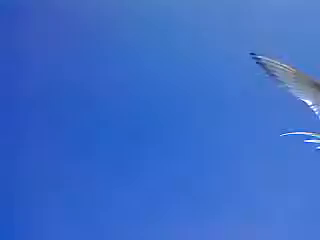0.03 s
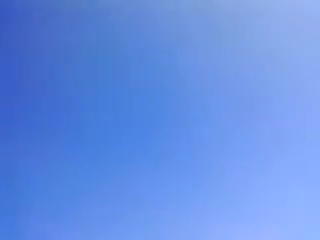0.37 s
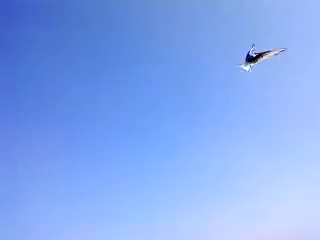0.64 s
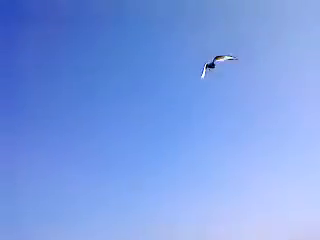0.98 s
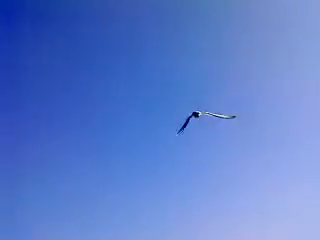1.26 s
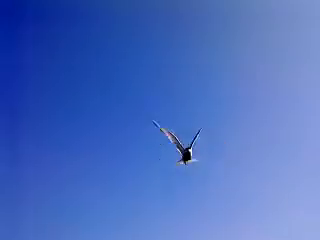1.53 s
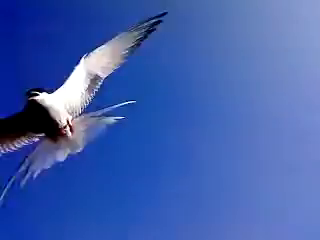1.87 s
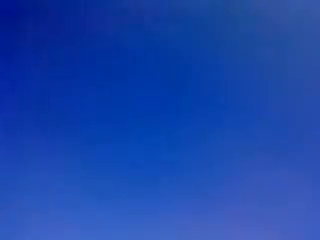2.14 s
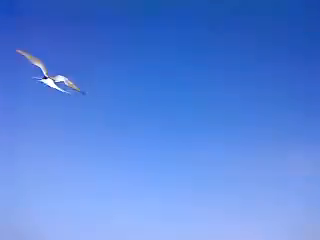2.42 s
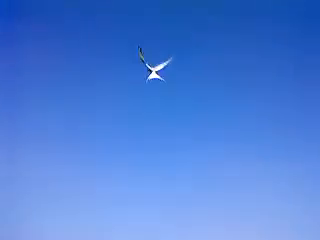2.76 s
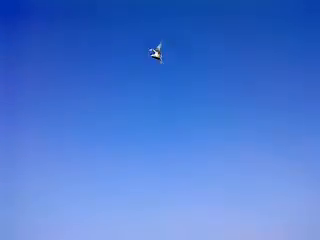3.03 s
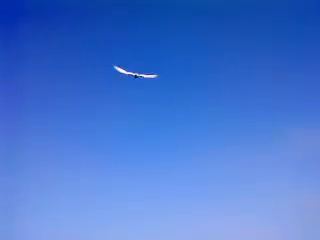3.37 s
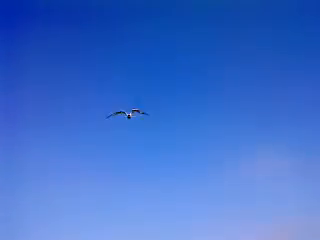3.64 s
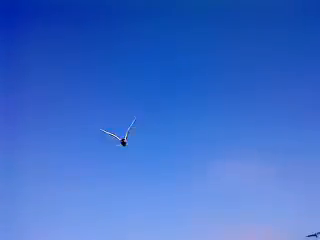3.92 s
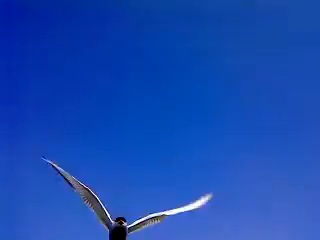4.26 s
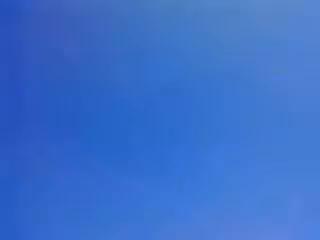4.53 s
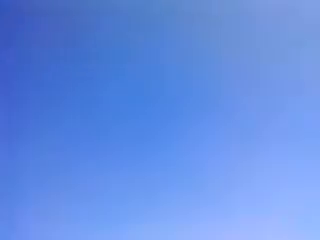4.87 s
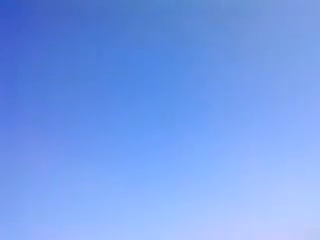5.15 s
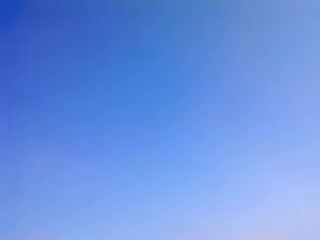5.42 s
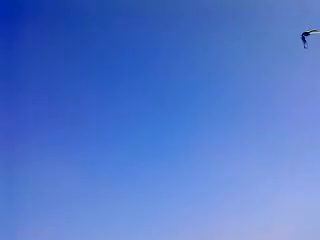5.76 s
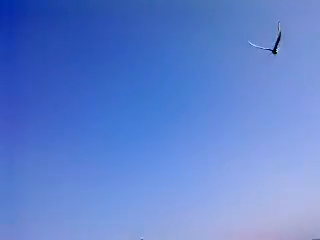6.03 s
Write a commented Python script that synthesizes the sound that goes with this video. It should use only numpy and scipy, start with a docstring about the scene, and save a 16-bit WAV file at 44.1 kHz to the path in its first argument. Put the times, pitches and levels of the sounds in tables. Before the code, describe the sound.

Sharp, high tern calls and a brief raspy rattle come from overhead over gusty low wind rumble and faint hiss.

```python
"""Open, windy shore: terns swoop at an intruder.
Eddies rumble and buffet the microphone. Background hiss dips after loud calls and creeps back.
The nearest bird dives with sharp 'kek' notes: chaotic syrinx pulses ringing the throat.
Others give falling 'kip' whistles that break into rasp, a chopped trill and a dry, pulsed rattle."""
import sys
import numpy as np
from scipy import signal
from scipy.fft import rfft, irfft
from scipy.io import wavfile
from scipy.ndimage import uniform_filter1d

SR = 44100
rng = np.random.default_rng(int(sys.argv[2]) if len(sys.argv) > 2 else 0)


def to_wav(s):
    """Save 16-bit WAV."""
    ch = np.atleast_2d(s).T  # columns
    pcm = np.round(np.clip(ch, -1, 1) * 32767)  # PCM
    wavfile.write(sys.argv[1], SR, pcm.astype(np.int16))


N = 272979
TIME_S = np.arange(N) / SR

# wind strength, deep rumble and hiss over time: t/s, level/dB
WIND_LEVEL = [(0.0, -34), (0.24, -29), (0.33, -52.5), (0.6, -43.5), (0.75, -24.5), (0.97, -15.5),
              (1.15, -34.5), (1.42, -21.5), (1.77, -23.5), (2.05, -47), (2.4, -53.5), (2.9, -38.5),
              (3.35, -47), (4.3, -46.5), (4.85, -33.5), (5.17, -60), (5.45, -49), (6.19, -55)]
DEEP_LEVEL = [(0.0, -29), (0.42, -43), (1.05, -28), (1.45, -33), (1.75, -29.5), (2.1, -50.5), (2.4, -48),
              (2.9, -36), (3.6, -37.5), (4.15, -36), (4.5, -31.5), (4.85, -40.5), (5.2, -48), (5.6, -38),
              (5.98, -44.5), (6.12, -34.5), (6.19, -36)]
HISS_LEVEL = [(0.0, -50.5), (0.28, -66), (0.6, -62), (0.8, -54), (1.05, -66), (1.35, -58.5), (1.9, -58.5),
              (2.05, -69), (2.55, -65.5), (3.05, -62), (3.3, -51.5), (3.75, -58), (4.52, -56), (4.75, -69),
              (5.05, -72), (5.3, -53.5), (5.85, -55.5), (6.19, -43.5)]
# rumble and hiss spectra: f/Hz, level/dB
DEEP_SPECTRUM = [(18, -7), (35, -10), (60, 0), (90, -1.5), (120, -14.5), (200, -27)]
MID_SPECTRUM = [(60, -17), (105, -0.5), (150, 1.5), (210, -4), (280, -15.5), (420, -40.5)]
UPPER_SPECTRUM = [(170, -17.5), (280, 7), (350, 0), (450, -5.5), (650, -15), (1000, -36.5), (1600, -63)]
HISS_BODY_SPECTRUM = [(200, -13.5), (500, 2.5), (900, -1.5), (1500, 1), (2300, 1), (3300, 0), (5000, -4),
                      (7000, -18.5)]
HISS_TOP_SPECTRUM = [(1500, -17), (2500, -2), (3400, 3), (4500, -1.5), (6000, 3), (7000, -0.5)]
# treble swells of the hiss: peak t/s, half width/s, level/dB
HISS_SWELLS = [(1.42, 0.22, -46.5), (3.38, 0.14, -45.5), (4.655, 0.019, -27), (5.45, 0.23, -43.5),
               (6.19, 0.14, -35.5)]
# single eddies: t/s, level/dB, f/Hz, length/s
EDDIES = [(0.002, -9, 166, 0.015), (0.228, -14.5, 90, 0.02), (0.68, -16.5, 94, 0.022),
          (0.842, -9, 125.4, 0.029), (0.944, -15.5, 207, 0.033), (1.058, -14.5, 223, 0.018),
          (1.441, -7, 181, 0.037), (1.7, -17, 98.3, 0.037), (1.763, -11, 221, 0.021),
          (2.217, -29.5, 120, 0.041), (2.425, -17, 202, 0.019), (2.569, -17.5, 114.6, 0.022),
          (2.749, -18.5, 124, 0.016), (2.824, -19, 161, 0.025), (2.908, -16.5, 114, 0.031),
          (3.185, -21.5, 64.6, 0.023), (3.255, -17.5, 105, 0.021), (3.555, -20.5, 103, 0.026),
          (3.647, -19.5, 134, 0.033), (3.829, -16, 61.6, 0.026), (4.477, -8.5, 118, 0.033),
          (4.684, -24.5, 214, 0.026), (4.753, -20.5, 107, 0.018), (4.825, -17, 128, 0.019),
          (5.022, -24, 162, 0.028), (6.129, -23.5, 125, 0.064)]
# throat resonances of the rattle: f/Hz, width/Hz, level/dB
RATTLE_FORMANTS = [(2740, 480, -2.5), (3740, 220, 4.5), (5200, 700, -11.5)]
# trill contour: t/s, f/Hz, level/dB, chop depth/0-1
TRILL_CONTOUR = [(1.007, 2960, -42.5, 0.12), (1.019, 3194, -41.5, 0.06), (1.068, 3140, -40.5, 0),
                 (1.113, 3230, -29, 1), (1.161, 3070, -33, 0.6), (1.204, 2970, -32.5, 0.98),
                 (1.226, 3150, -30, 0.6)]
# kip calls: t/s, length/s, f/Hz, level/dB, octave/dB re tone, 1.5 f overtone/dB re tone
KIP_CALLS = [(0.246, 0.058, 3630, -38, -6, -12), (0.612, 0.058, 3290, -39, -10.5, -36),
             (0.723, 0.057, 3390, -27, -8, -19), (0.948, 0.062, 3490, -31.5, -6.5, -36),
             (1.083, 0.03, 3550, -20, -1.5, -50), (1.506, 0.053, 3450, -25.5, -7, -17),
             (2.23, 0.058, 3760, -54.5, -21, -16), (2.452, 0.057, 3540, -47.5, -8, -26),
             (2.686, 0.063, 3400, -31, -7, -29.5), (2.924, 0.071, 3548, -25.5, -3, -28),
             (3.04, 0.061, 3533, -31.5, -3, -18.5), (3.139, 0.038, 3950, -45, -3.5, 0),
             (3.205, 0.064, 3399, -19.5, -1.5, -45), (3.433, 0.0251, 3270, -21, -0.5, -31),
             (3.645, 0.048, 3510, -37.5, -2.5, -11), (4.034, 0.053, 3850, -39.5, -28, 4.5),
             (4.752, 0.053, 4230, -51, -38, -10), (5.255, 0.064, 3510, -35, -11, -34),
             (5.387, 0.059, 3480, -29.5, -17, -35), (5.7847, 0.058, 3366, -23.5, 3, -20)]
# arch and fall of a kip: share of length, pitch ratio, level/dB, roughness/0-1
KIP_CONTOUR = [(0, .985, -1, 0), (.18, 1, -.5, 0), (.33, .995, 0, 0), (.5, .94, 0, .08),
               (.6, .875, -4, .25), (.72, .81, -9.5, .6), (.86, .745, -11, .7), (1, .68, -18, .75)]
# further ticks, mostly alone, one just before the kek at 4.54 s: t/s, level/dB, f/Hz
EXTRA_TICKS = [(0.208, -27.5, 4500), (1.76, -26, 6670), (1.935, -32, 4700), (4.5153, -25.5, 2400),
               (4.696, -40, 4750), (4.964, -47.5, 2900)]
# kek notes: t/s, hold/s, low f/Hz, level/dB, upper f/Hz, level/dB, lead-in tick share/0-1
KEK_NOTES = [(0.076, 0.0069, 3340, -23, 6280, -19.5, 0.4), (0.1789, 0.0091, 3100, -24, 4700, -20.5, 0.05),
             (0.836, 0.0084, 3530, -34, 4480, -34.5, 0.13), (0.945, 0.014, 3220, -31.5, 4590, -31, 0.07),
             (1.098, 0.0048, 3330, -41, 4640, -23.5, 0.4), (1.226, 0.0093, 3260, -27, 4640, -30, 0.1),
             (1.337, 0.011, 3110, -24.5, 4900, -27, 0.2), (1.8075, 0.008, 2730, -26.5, 5660, -19, 0.18),
             (1.9136, 0.0095, 3440, -31, 5230, -17, 0.08), (2.0142, 0.0086, 3290, -17, 5840, -20.5, 0.15),
             (2.1322, 0.015, 2820, -18.5, 5450, -56, 0.54), (3.754, 0.0041, 2820, -26, 5770, -24.5, 0),
             (3.889, 0.0062, 3330, -25, 5980, -27, 0.05), (3.996, 0.0054, 3080, -23.5, 5870, -22.5, 0.06),
             (4.4283, 0.007, 2490, -20.5, 5870, -20.5, .05), (4.5386, 0.008, 3520, -20, 5470, -18.5, 0.1),
             (4.6317, 0.022, 3770, -28.5, 5090, -18, 0.74), (6.007, 0.005, 3040, -30.5, 4540, -28.5, 0),
             (6.1153, 0.0078, 3240, -32.5, 4980, -24, 0.5)]
# weak throat resonances of all keks: f/Hz, level/dB re upper resonance
KEK_FORMANTS = [(4350, -8.5), (6400, -16)]


def from_db(db):
    """Decibels to gain."""
    return 10 ** (np.asarray(db) / 20)


def unit_rms(x):
    """Scale to rms 1."""
    return x / np.sqrt(np.mean(x ** 2) + 1e-20)


def even(x, samples):
    """Hold the running rms at 1."""
    return x / np.sqrt(np.abs(uniform_filter1d(x * x, samples)) + 1e-12)


def curves(rows, at):
    """Interpolate each column against the first."""
    knots, *columns = np.transpose(rows)
    return [np.interp(at, knots, column) for column in columns]


def add(out, start_s, sound):
    """Mix in at a start time."""
    i = max(int(start_s * SR), 0)
    out[i:i + len(sound)] += sound[:max(N - i, 0)]


def drift(rate_hz, samples):
    """Unit normal draws at rate_hz, joined by lines."""
    return np.interp(np.arange(samples) * rate_hz / SR, np.arange(samples), rng.standard_normal(samples))


def resonate(x, hz, *widths_hz):
    """Unity-peak resonators at hz in series, one per width."""
    for width_hz in widths_hz:
        r = np.exp(-np.pi * width_hz / SR)
        feedback = [1, -2 * r * np.cos(2 * np.pi * hz / SR), r * r]
        x = signal.lfilter(np.array([1, 0, -1]) * (1 - r * r) / 2, feedback, x)
    return x


def noise(spectrum):
    """Coloured noise, rms 1, 12 dB/octave skirts."""
    hz, db = np.transpose(spectrum)
    bins_hz = np.maximum(np.fft.rfftfreq(N, 1 / SR), 1)
    gain = from_db(np.interp(np.log(bins_hz), np.log(hz), db))
    skirts = np.minimum(bins_hz / hz[0], 1) ** 2 * np.minimum(hz[-1] / bins_hz, 1) ** 2
    return unit_rms(irfft(rfft(rng.standard_normal(N)) * gain * skirts, N))


def gate(t, length, rise, fall):
    """Trapezoid envelope."""
    return np.clip(t / rise, 0, 1) * np.clip((length - t) / fall, 0, 1)


def phase_rad(hz):
    """Running phase."""
    return 2 * np.pi * np.cumsum(hz) / SR


def pulses(hz):
    """One click per syrinx closure."""
    return np.diff(np.floor(np.cumsum(hz) / SR), prepend=-1)


def hiss(body_db=7.0, top_db=6.5, swell_db=4.5, flutter_db=2.0):
    """Background hiss on a set curve: dips after loud calls, creeps back; a few treble swells."""
    level_db, = curves(HISS_LEVEL, TIME_S)
    swells = sum(from_db(db + swell_db) * np.exp(-((TIME_S - peak_s) / width_s) ** 2)
                 for peak_s, width_s, db in HISS_SWELLS)
    body = from_db(level_db + body_db) * noise(HISS_BODY_SPECTRUM)
    top = np.hypot(from_db(level_db + top_db), swells) * noise(HISS_TOP_SPECTRUM)
    return (body + top) * from_db(flutter_db * drift(90, N))


def wind(lump_db=4.5, low_db=-1.5, upper_db=-13.5, upper_lump_db=6.0, breeze_db=-30, upper_growth=1.016):
    """Eddies on the microphone port: lumpy rumble in three bands."""
    strength_db, = curves(WIND_LEVEL, TIME_S)
    deep_db, = curves(DEEP_LEVEL, TIME_S)
    deep = from_db(deep_db + low_db) * even(noise(DEEP_SPECTRUM), 2500)
    mid = from_db(strength_db + low_db) * even(noise(MID_SPECTRUM), 1500)
    gust_db = breeze_db + upper_growth * (strength_db - breeze_db) + upper_lump_db * drift(30, N)
    upper = from_db(gust_db + upper_db) * even(noise(UPPER_SPECTRUM), 1500)
    return (deep + mid + upper) * from_db(lump_db * drift(70, N))


def buffets(level_db=-4.0, churn_db=-16.5, stir_power=1.8):
    """Single eddies rock the air at the port; faster swings stir more upper rumble."""
    swings, stir = np.zeros(N), np.zeros(N)
    for start_s, db, hz, length_s in EDDIES:
        swell = from_db(db + level_db) * np.sqrt(np.hanning(int(length_s * SR)).clip(0))
        waver = 1 + .45 * np.tanh(drift(250, len(swell)))
        add(swings, start_s, swell * np.sin(phase_rad(hz * waver) + rng.uniform(0, 2 * np.pi)))
        add(stir, start_s, swell * (hz / 130) ** stir_power)
    return swings + stir * from_db(churn_db) * even(noise(UPPER_SPECTRUM), 1500)


def ground_scatter(sound, decay_s=0.027, delay_s=0.006):
    """Short, diffuse tail off uneven ground."""
    t = np.arange(SR // 6) / SR
    tail = rng.standard_normal(len(t)) * np.exp(-t / decay_s) * (t > delay_s)
    return signal.fftconvolve(sound, tail / np.linalg.norm(tail))[:N]


def rattle(start_s=1.2445, peak_s=1.367, end_s=1.693, peak_db=-27.5, rise_db_per_s=16, fade_db_per_s=20.5,
           pulse_hz=800, sag_hz_per_s=210, syllable_hz=66.9, tiring=0.22, sweep=0.068, breath=0.092):
    """Syrinx pulses ring the throat in uneven, buzzy syllables; both slow as the cry runs out."""
    t = np.arange(start_s, end_s, 1 / SR)
    age_s = t - start_s
    syllable_phase = np.cumsum(syllable_hz * (1 - tiring * (age_s / age_s[-1]) ** 6)) / SR % 1
    bend = 1 + sweep * (syllable_phase - .3) + .017 * drift(500, len(t))
    source = pulses((pulse_hz - sag_hz_per_s * age_s) * bend) + breath * rng.standard_normal(len(t))
    voice = sum((-1) ** k * from_db(db) * resonate(source, hz, width_hz)
                for k, (hz, width_hz, db) in enumerate(RATTLE_FORMANTS))
    voice = signal.sosfilt(signal.butter(4, 2100, "high", fs=SR, output="sos"), voice)
    level_db = peak_db - np.maximum(rise_db_per_s * (peak_s - t), fade_db_per_s * (t - peak_s))
    level_db += 1.8 * drift(syllable_hz, len(t))
    opening = gate(syllable_phase, length=.76, rise=.05, fall=.3) + .07
    out = np.zeros(N)
    add(out, start_s, unit_rms(voice) * from_db(level_db) * opening)
    return out


def trill(notes_per_s=70, chop_origin_s=1.112, flick=0.16, jitter=0.026, octave_db=-9.5, rasp_db=-6.0):
    """Thin whistle, chopped into raspy notes that flick up in pitch at their ends."""
    start_s, end_s = TRILL_CONTOUR[0][0], TRILL_CONTOUR[-1][0]
    t = np.arange(start_s, end_s, 1 / SR)
    hz, db, depth = curves(TRILL_CONTOUR, t)
    shut = depth * (1 - np.abs(np.sin(np.pi * notes_per_s * (t - chop_origin_s))))
    phase = phase_rad(hz * (1 + flick * shut) * (1 + jitter * depth * drift(1700, len(t))))
    tone = np.sqrt(2) * (np.sin(phase) + from_db(octave_db) * np.sin(2 * phase))
    rasp = depth * from_db(rasp_db) * unit_rms(resonate(rng.standard_normal(len(t)), 4500, 3400))
    envelope = (1 - shut) ** 2 * from_db(db) * gate(t - start_s, end_s - start_s, .003, .003)
    out = np.zeros(N)
    add(out, start_s, (tone + rasp) * envelope)
    return out


def kips(waver=0.0096, jitter=0.043, kink=0.025, shimmer_db=2.5, doubling_db=-1.5, split=0.42,
         rasp_db=1.0, creak_hz=420, tick_db=-8.0, tick_decay_s=0.0057):
    """Tick, then whistle; as pitch falls, the period doubles and tone gives way to rasp."""
    out = np.zeros(N)
    for start_s, length_s, hz, db, octave_db, overtone_db in KIP_CALLS:
        t = np.arange(int(length_s * SR)) / SR
        bend, shape_db, rough = curves(KIP_CONTOUR, t / length_s)
        bend **= min(length_s / .05, 1)   # short calls fall less
        hoarse = min(from_db(overtone_db), 1) ** .5
        shape_db *= 1 - .81 * hoarse   # hoarse calls fade less
        wobble = (waver + jitter * rough) * drift(2500, len(t)) + kink * rough * drift(160, len(t))
        phase = phase_rad(hz * bend * (1 + wobble))
        tone = np.sin(phase) + from_db(octave_db + shimmer_db * drift(210, len(t))) * np.sin(2 * phase)
        tone += (from_db(overtone_db) + rough * from_db(doubling_db)) * np.sin(1.5 * phase)
        tone *= 1 + split * rough * np.cos(phase / 4)   # second period doubling
        air = unit_rms(resonate(resonate(rng.standard_normal(len(t)), 2000, 3600), 3600, 6300))
        voice = np.sqrt(2) * tone * (1 - rough / 2) + air * rough * from_db(rasp_db)
        creak = 1 + rough * np.cos(phase_rad(creak_hz * np.exp(.19 * drift(500, len(t)))))
        tick = air * from_db(tick_db) * np.exp(-t / tick_decay_s)
        call = voice * creak * gate(t, length_s, rise=.0018, fall=.00048) + tick
        add(out, start_s, call * from_db(db + shape_db))
    return out


def ticks(lead_s=0.0195, hold_s=0.005, decay_s=0.0025, level_db=-0.5):
    """Dry chips: the voice catches before a kek, on its louder resonance; a few more are listed apart, most of
    them alone."""
    out, t = np.zeros(N), np.arange(SR // 50) / SR
    chips = [(start_s, from_db(db), hz) for start_s, db, hz in EXTRA_TICKS]
    for start_s, _, low_hz, low_db, upper_hz, upper_db, share in KEK_NOTES:
        db, hz = max((low_db, low_hz), (upper_db, upper_hz))
        chips.append((start_s - lead_s, share * from_db(db), hz))
    envelope = from_db(level_db) * np.exp(-np.maximum(t - hold_s, 0) / decay_s)
    for start_s, gain, hz in chips:
        chip = even(resonate(rng.standard_normal(len(t)), hz, 2200, 9000), 130)
        add(out, start_s, chip * gain * envelope)
    return out


def keks(floor_hz=300, excess_hz=1300, slowing_s=0.012, jitter=0.3, breath=0.42,
         rasp_db=1.0, chest_db=-11.5, thud_db=-22.5, rise_s=0.001, fade_db_per_s=1580):
    """Chaotic pulses ring the throat and slow as pressure drops."""
    out, t = np.zeros(N), np.arange(SR // 16) / SR
    for start_s, hold_s, low_hz, low_db, upper_hz, upper_db, _ in KEK_NOTES:
        throat = [(low_hz, low_db), (upper_hz, upper_db)]
        throat += [(hz, upper_db + db) for hz, db in KEK_FORMANTS]
        rate_hz = (floor_hz + excess_hz * np.exp(-t / slowing_s)) * np.exp(jitter * drift(900, len(t)))
        clicks = pulses(rate_hz)
        opening = signal.lfilter([1], [1, -.94], clicks)
        source = clicks + breath * opening * rng.standard_normal(len(t))
        voice = sum(from_db(db) * even(resonate(source, hz, 380, 1300), 260) for hz, db in throat)
        rasp = from_db(rasp_db) * even(resonate(source, 4200, 3200, 7900), 260)
        chest = from_db(chest_db) * even(resonate(source, 1890, 990), 260)
        thud = from_db(thud_db) * even(resonate(source, 860, 400), 260)
        crack = (rasp + chest + thud) * np.std(voice)
        envelope = np.minimum(t / rise_s, 1) * from_db(-fade_db_per_s * np.maximum(t - hold_s, 0))
        add(out, start_s, (voice + crack) * envelope)
    return out


def scene(ground_db=-35.0):
    """Terns overhead in open air, over the wind; mono."""
    birds = kips() + keks() + ticks() + trill() + rattle()
    return (birds + from_db(ground_db) * ground_scatter(birds) + wind() + buffets() + hiss())[None]


def record(dry):
    """Narrow band: steep cut at 7 kHz, further roll-off from 9.5 kHz."""
    narrow = signal.sosfilt(signal.ellip(8, .3, 46, 7000, fs=SR, output="sos"), dry)
    return signal.sosfilt(signal.butter(6, 9500, fs=SR, output="sos"), narrow)


dry = scene()
out = record(dry)
to_wav(out)
```